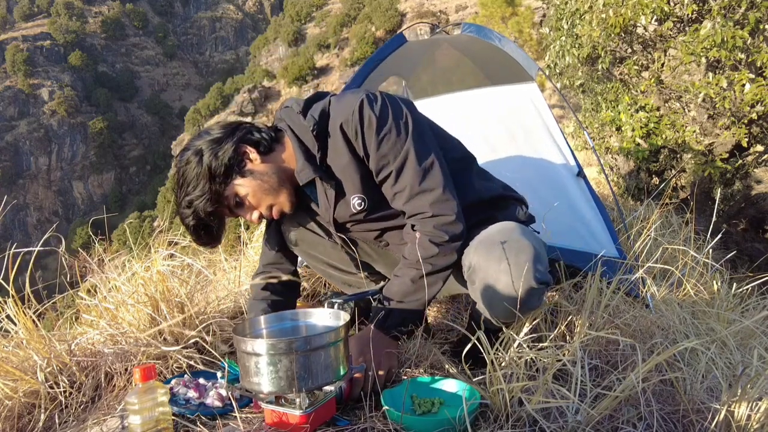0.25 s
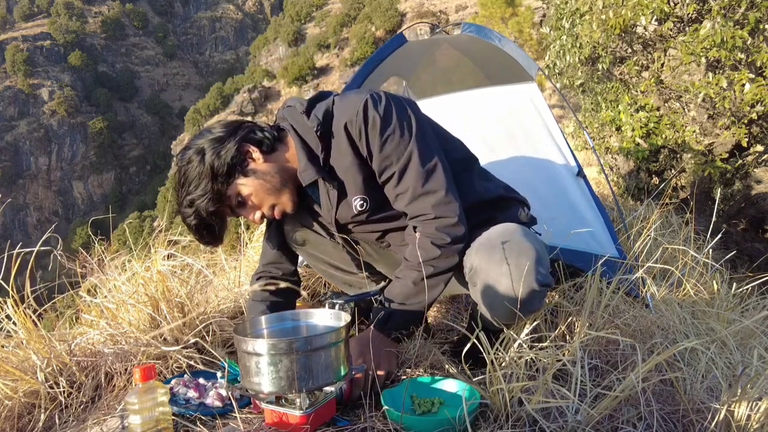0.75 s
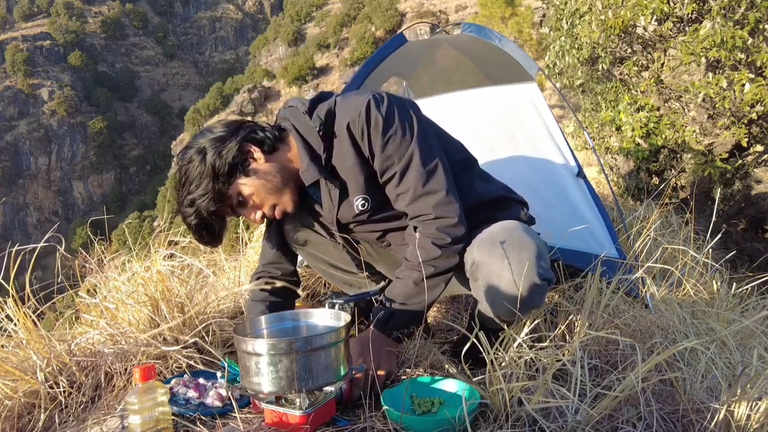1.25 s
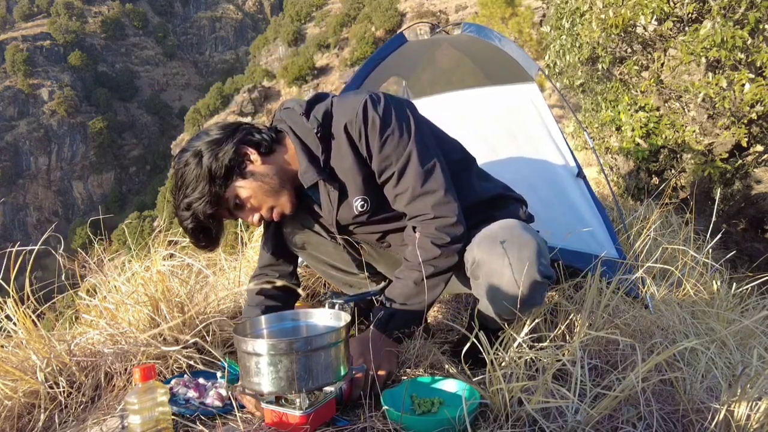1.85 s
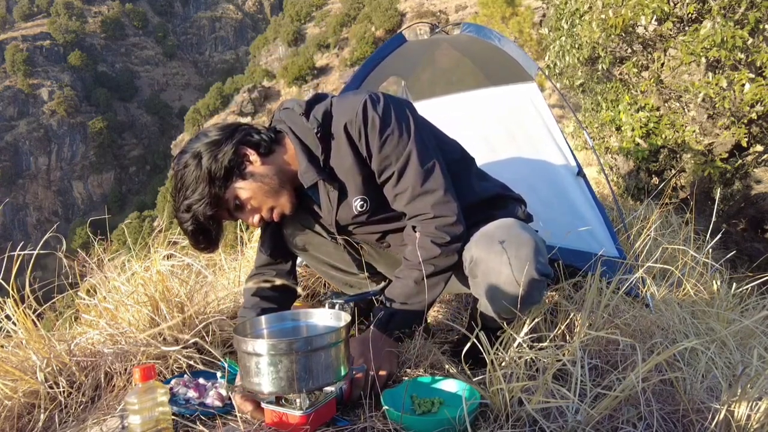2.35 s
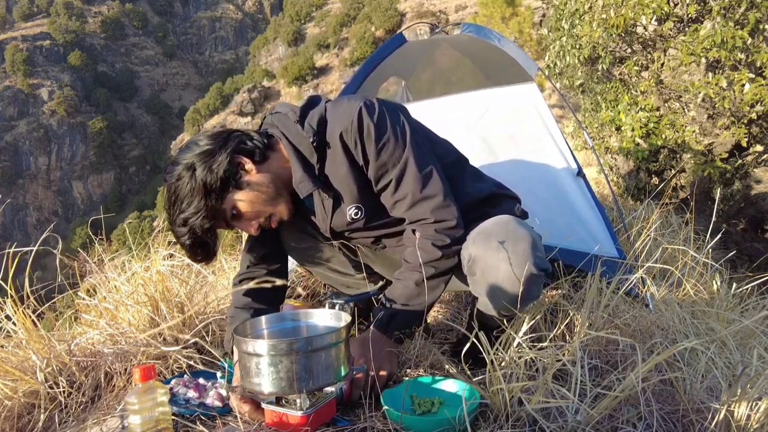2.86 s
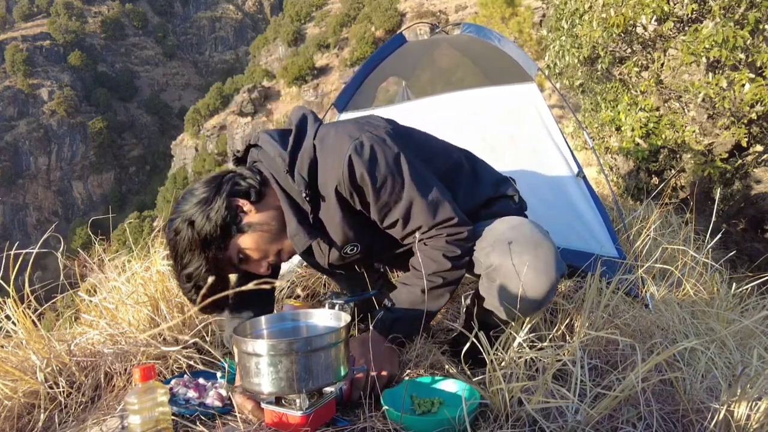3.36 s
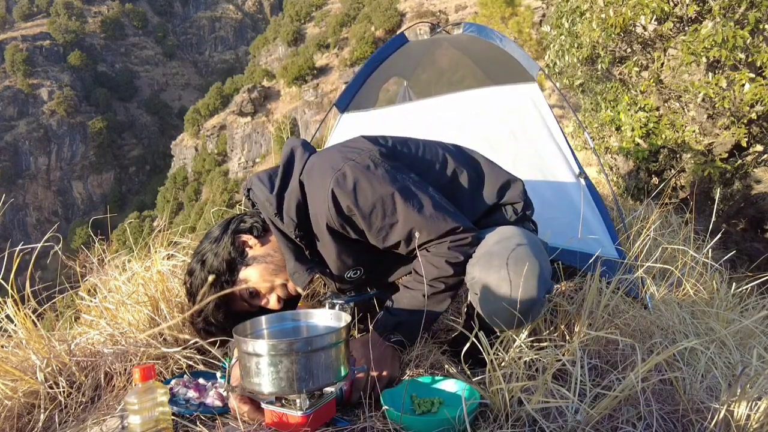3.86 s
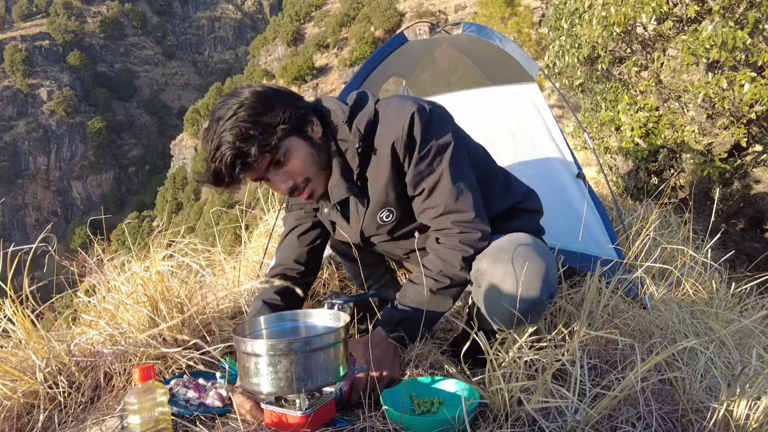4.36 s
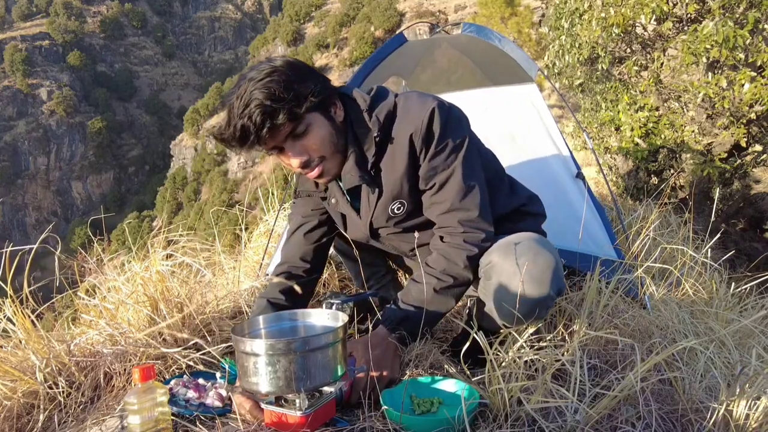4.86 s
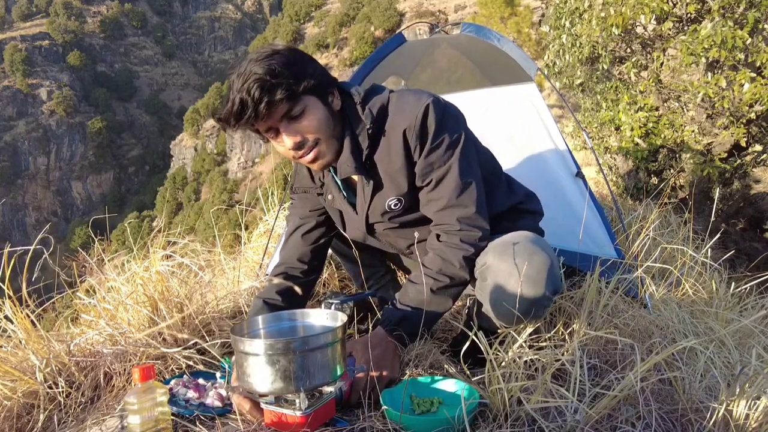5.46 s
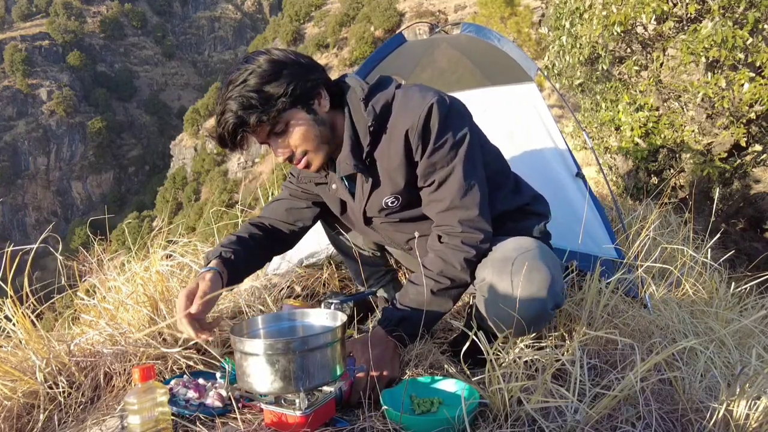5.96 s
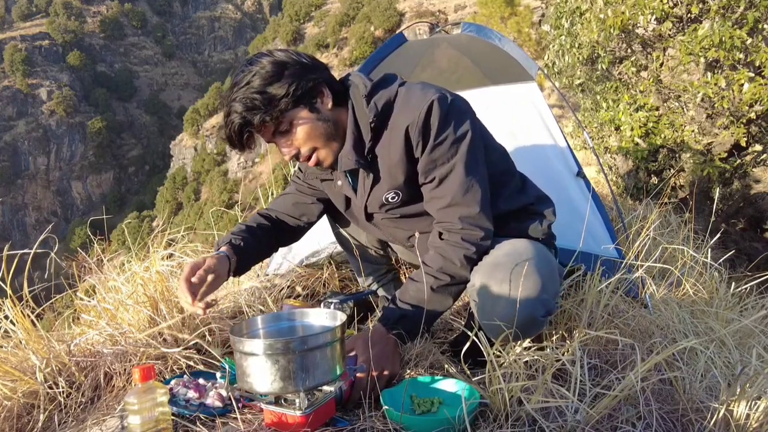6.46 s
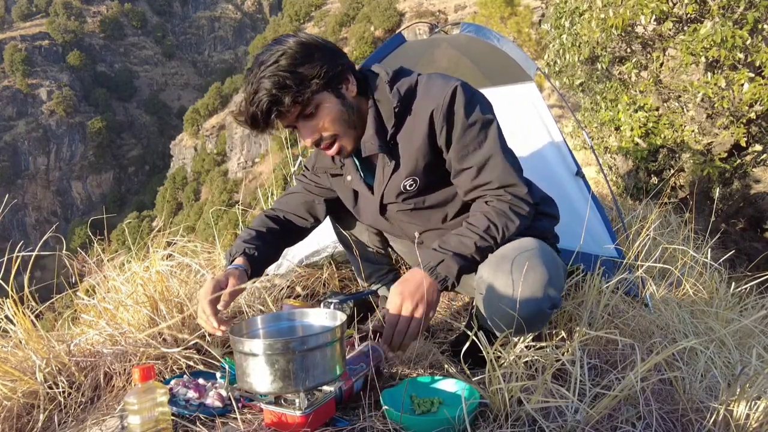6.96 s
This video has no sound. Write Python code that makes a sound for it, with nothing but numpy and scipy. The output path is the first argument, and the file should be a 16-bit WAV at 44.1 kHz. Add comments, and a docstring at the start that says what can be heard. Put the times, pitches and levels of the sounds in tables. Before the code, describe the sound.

A portable stove is lit beneath a steel pot, heard close in dry open air. Light knob ticks and airy gas spurts come first, over faint low wind. Bright, sharp snaps with short metallic ringing follow, two spaced apart, then six fairly regular ones. The gas catches with a low, muffled whump, leaving a very soft flame, thin hiss, finger taps and jacket rustle.

```python
"""A portable gas stove is lit under a steel pot: eight igniter snaps strike damped modes of casing and pot.
Gas hisses as noise shaped by the mixing tube, with airy whistles; the knob ticks as it turns back.
Just after the last spark, swings of pressure make pops and a low thump, and low noise makes the flame.
Jacket and dry grass rustle as grainy noise, fingers tap and rub the stove,
and behind lie a faint, wavering low wind and a short twitter of a distant bird."""
import sys
import numpy as np
from scipy import signal
from scipy.fft import rfft, irfft, next_fast_len
from scipy.io import wavfile

SR = 44100
rng = np.random.default_rng(int(sys.argv[2]) if len(sys.argv) > 2 else 0)


def waveform_to_disk(signal):
    """Save audio, clipped to [-1, 1], as 16-bit WAV at the path in sys.argv[1]."""
    frames = np.transpose(np.atleast_2d(signal))
    scaled = np.clip(frames, -1, 1) * 32767
    samples = np.round(scaled).astype(np.int16)
    wavfile.write(sys.argv[1], SR, samples)


N = 318222
TIME = np.arange(N) / SR  # s
EDGE_HZ = 15900  # upper edge of the whole sound

# All spectra below are relative: noise() brings them to rms 1. Layer trims apply to the other levels.
# IGNITER
# snaps: [t/s, level/dB, treble/dB, base knock/dB, casing tilt/dB per octave,
#         cocking scrape/s, scrape level/dB, left minus right/dB]; levels after the first are relative to it
SNAPS = [(2.2971, -27.5, 1, -5.5, 0.5, 0.0044, -24, 2), (2.8287, -27, 1, -13, 5.5, 0.028, -19, -0.5),
         (4.0437, -27.5, 1.5, -5.5, 1, 0.0056, -9.5, 3), (4.304, -27, -0.5, 0.5, -1, 0.0048, -4.5, 0),
         (4.5318, -26, -2, 0, -0.5, 0.017, -13.5, -1.5), (4.7627, -25.5, -2, 0, -1, 0.0028, -6, 4.5),
         (4.995, -24.5, 0.5, 0, -3, 0.013, -17, -0.5), (5.2041, -23.5, -1.5, -1.5, -2, 0.016, -20, 0)]
# stove casing modes: [f/Hz, level standing free/dB, level steadied by a hand/dB, t60/s]
CASING_MODES = [(1080, -16.5, -27, 0.11), (1162, -27, -12, 0.04), (1315, -12, -11, 0.09),
                (1594, -1, -8, 0.029), (1690, -15, -8, 0.032), (2500, -16, -10.5, 0.029),
                (2670, -1, -1.5, 0.024), (3396, -4, -1.5, 0.026)]
# modes of the pot and its supports: [f/Hz, level standing free/dB, level steadied by a hand/dB, t60/s]
POT_MODES = [(339, -13.5, -14.5, 0.61), (495, -17, -5.5, 0.52), (557, -24, -12, 0.4),
             (632, -10.5, -19, 0.079), (995, -3.5, -14, 0.54), (1026, -4.5, -5.5, 0.54),
             (1213, -18, -2, 0.19), (1250, -6, 2.5, 0.37), (1270, -25, 6.5, 0.19), (1510, -14, -10, 0.77),
             (2030, -16, -20, 0.9), (2410, -15, -4, 0.28), (2710, -5, -6, 0.6), (2840, -5, -22, 0.46),
             (3700, -12, -33, 0.11), (3600, -24, -4, 0.25), (4060, -12, -61, .2)]
# base plate modes: [f/Hz, level/dB, t60/s]
BASE_MODES = [(550, -23, 0.016), (667, -12, 0.02), (800, -15, 0.017), (897, -22, 0.017)]
# spectrum of the crack: [f/Hz, level/dB]
CRACK_SPECTRUM = [(300, -37), (1000, -10.5), (1700, -7), (2150, -22), (2700, 0), (3400, -10.5), (3950, -18),
                  (4400, -1.5), (5500, -8), (6800, -4.5), (8100, -4), (9000, -1), (9800, -4.5),
                  (11800, -2.5), (13400, 1), (16000, 5.5)]
# resonances of the hammer and its spring: [f/Hz, width/Hz, level over the crack/dB]
SPRING_PEAKS = [(7470, 160, 12.5), (9080, 250, 4.5), (10600, 700, 5), (13490, 350, 8), (15650, 170, -3)]
# spectrum of loose rattling parts: [f/Hz, level/dB]
RATTLE_SPECTRUM = [(200, -15), (500, -12.5), (850, -1.5), (1250, 11.5), (1650, 8), (2100, 1.5), (2650, 3),
                   (3400, -5.5), (4000, 1.5), (5500, -7.5), (7500, -5.5), (11000, -7.5), (16000, -2)]
# how the casing colours those parts: [f/Hz, width/Hz, level/dB]
CHASSIS_PEAKS = [(955, 180, -10), (1280, 120, 3.5), (1370, 130, -2.5), (2150, 330, -7), (2710, 250, -0.5),
                 (3060, 240, -2), (3430, 250, 10.5), (3730, 330, -9)]
STEADIED_S = 3.5  # from here a hand steadies the stove

# KNOB AND FINGERS
# ticks of the valve knob: [t/s, level/dB, treble relative to it/dB]
TICKS = [(.145, -69, 3), (.980, -74, 4.5), (1.094, -48.5, -6), (1.441, -51, -5), (2.5786, -46.5, -4),
         (3.081, -44.5, 0), (3.733, -52.5, 6.5), (3.867, -70, 4), (4.2119, -39.5, -3.5), (4.448, -41.5, -2),
         (4.662, -41, -1), (4.884, -39.5, -2.5), (5.1203, -43.5, -0.5), (5.3197, -39, -6),
         (5.492, -50, -12)]
# spectrum of the bright edge of a tick: [f/Hz, level/dB]
TICK_SPECTRUM = [(300, -48), (700, -1), (1100, -12), (1600, 2.5), (2100, -3), (2500, -3), (3000, -6),
                 (6200, -3.5), (6900, -10.5), (7600, -2), (8200, -9.5), (11500, -15), (13200, -1.5),
                 (16000, 0.5)]
# fingers tapping the stove: [t/s, level/dB, resonance f/Hz]
TAPS = [(2.074, -57.5, 1310), (2.477, -57, 1340), (3.277, -54.5, 1530), (5.351, -53.5, 1200),
        (5.493, -50.5, 1590), (6.632, -57, 1255)]
# spectrum of a tap: [f/Hz, level/dB]
TAP_SPECTRUM = [(300, -21), (800, -2), (1400, -3), (2500, -9), (6000, -24), (16000, -36)]
TAP_WIDTH_HZ, TAP_PEAK_DB = 210, 17  # width and height of the tap's resonance
# casing modes stirred by rubbing fingers: [f/Hz, level/dB, t60/s]
RUBBED_MODES = [(1089, -7.5, 0.16), (1203, -2, 0.062), (1326, 0, 0.062), (1454, 1.5, 0.038),
                (1520, -25, 0.018)]
# fingers rub the knob just before each snap once the stove is steadied; level ahead of the bass cut
GRIP_LEAD_S, GRIP_WIDTH_S, GRIP_DB = 0.017, 0.098, -64
# at the end a hand slides along the casing; level ahead of the bass cut
SLIDE_S, SLIDE_WIDTH_S, SLIDE_DB = 7.1, 0.25, -61.5

# GAS
# spurts as the valve is opened by stages: [t/s, level/dB, rise/s, hold/s, t60/s]
SPURTS = [(1.079, -57, 0.044, 0.04, 0.14), (1.199, -54.5, .15, 0.052, 0.97),
          (1.439, -51.5, 0.079, 0.07, 1.7), (1.832, -57.5, 0.18, 0.09, 0.35)]
# spectrum of the jet: [f/Hz, level/dB]
JET_SPECTRUM = [(200, -41), (600, -9), (1000, -8), (2000, -7.5), (4000, -6.5), (4700, -10.5), (6400, -9.5),
                (7000, -21), (9200, -9.5), (10000, -18), (16000, -14.5)]
# resonances of the mixing tube and burner: [f/Hz, width/Hz, level over the jet/dB]
TUBE_PEAKS = [(1374, 175, 8), (2496, 150, 8.5), (3190, 290, 6.5), (3700, 140, -1), (5670, 150, 7),
              (7720, 390, 11), (8550, 300, 0.5)]
# spectrum of the tube's whistle: [f/Hz, level/dB]
TUBE_WHISTLE_SPECTRUM = [(2200, -34), (2970, -3.5), (3140, 8), (3320, -23), (4400, -62)]
# spectrum of the nozzle's whistle: [f/Hz, level/dB]
NOZZLE_WHISTLE_SPECTRUM = [(4500, -50), (5400, -18), (5620, 11), (6000, -5), (7500, -56)]
# the steady flow behind the spurts weakens slowly
FLOW_FROM_S, FLOW_DB, FLOW_SAG_DB_PER_S = 1.2, -64.5, 0.65
# each whistle follows a share of the flow
TUBE_SHARE_DB, NOZZLE_SHARE_DB = -11.5, -8.5
FULL_FLOW_DB = -52  # flow at which the nozzle gets its full share; weaker flow gives it less
# the tube swells as the flow settles, the nozzle as the burner warms
TUBE_SWELL_S, TUBE_SWELL_DB, NOZZLE_SWELL_S, NOZZLE_SWELL_DB = 1.62, -62, 5.99, -72.5

# IGNITION
# spectrum of the flare's roar: [f/Hz, level/dB]
FLARE_SPECTRUM = [(20, 0), (90, -9), (200, 0.5), (265, -24), (400, -6), (620, -15), (850, -25), (1200, -57),
                  (2000, -45), (6000, -60)]
# spectrum of the burning flame: [f/Hz, level/dB]
FLAME_SPECTRUM = [(15, -2.5), (28, -3), (80, -12), (200, -18.5), (600, -45)]
# the flame front runs round the burner in evenly spaced, growing pops
LIGHT_S, POP_GAP_S, POP_DB, POP_GROWTH_DB, POP_SWING_S = 5.229, 0.01004, -19, 2, 0.0015
# the pooled gas goes up in one thump; the rebound of the air comes later, its level relative to the thump
THUMP_S, THUMP_DB, THUMP_SWING_S, REBOUND_S, REBOUND_DB = 5.2485, -9, 0.0045, 0.0277, -16
# the roar peaks just before the thump
ROAR_S, ROAR_WIDTH_S, ROAR_DB = 5.237, 0.028, -31.5

# CAMPER
# movements: [middle t/s, half length/s, jacket and grass level/dB, sleeve on stove level/dB]
MOVES = [(0.106, 0.48, -64, -74), (0.658, 0.12, -70, -78.5), (1.805, 0.66, -72.5, -73),
         (3.255, 0.1, -62.5, -58.5), (3.585, 0.28, -61.5, -62.5), (4.524, 0.96, -65, -68.5),
         (5.85, 0.53, -70, -69.5), (6.538, 0.22, -66, -70.5), (7.176, 0.37, -59, -65)]
# spectrum of jacket and grass: [f/Hz, level/dB]
CLOTH_SPECTRUM = [(100, 9), (400, -22.5), (900, -9), (1400, -4), (2200, -5.5), (6000, -5), (8500, -7),
                  (11500, -9), (13500, -3), (16000, 3.5)]
# spectrum of the sleeve on the stove: [f/Hz, level/dB]
RUBBING_SPECTRUM = [(100, 5), (250, -5), (600, 1), (950, -4), (1400, -3.5), (1900, -6), (3000, -9.5),
                    (6000, -19), (16000, -17)]
# spectrum of the soft bump and brushing: [f/Hz, level/dB]
BRUSH_SPECTRUM = [(60, -10), (140, 4.5), (240, 4), (350, -3), (550, -11), (1500, -18), (4000, -22.5),
                  (16000, -36)]
# a soft bump as the camper leans down, with brushing around it
BUMP_S, BUMP_DB, BRUSH_DB = 3.223, -48.5, -59

# HILLSIDE
# spectrum of the breeze: [f/Hz, level/dB]
WIND_SPECTRUM = [(8.8, -12), (15, 5.5), (27, -6), (45, -0.5), (76, -7.5), (109, -6), (269, -20),
                 (336, -22.5), (420, -34.5), (550, -47), (920, -120)]
# small puffs of wind: [t/s, level/dB]
PUFFS = [(.67, -55.5), (.74, -65), (1.15, -56), (1.34, -55), (2.13, -53), (2.72, -50.5), (2.98, -57),
         (3.78, -53.5), (5.96, -57)]
# spectrum of a puff: [f/Hz, level/dB]
PUFF_SPECTRUM = [(12, -12), (35, 9.5), (60, -12), (130, -25)]
# spectrum of the bird's chirps: [f/Hz, level/dB]
CHIRP_SPECTRUM = [(4300, -60), (5000, -3), (5270, 3), (5550, -4), (6300, -60)]
# spectrum of the quiet background hiss: [f/Hz, level/dB]
AIR_SPECTRUM = [(180, -41), (300, -7.5), (411, -7.5), (446, -7.5), (953, -17), (1300, -9.5), (2320, -16.5),
                (15500, -16)]
WIND_DB = -65.5  # level about which the breeze wavers
BIRD_FROM_S, BIRD_TO_S, BIRD_JITTER_S, BIRD_DB, BIRD_SPREAD_DB = .4, .715, 0.0088, -71.5, 1.5

# STEREO
# likeness of the two channels of noise: [f/Hz, correlation from -1 to 1]
CHANNEL_LIKENESS = [(20, 0.99), (150, 0.99), (350, 0.67), (700, 0.18), (1400, 0.63), (2800, 0.58),
                    (5600, 0.17), (10000, 0.02), (15000, -.2)]


def igniter():
    """The hammer scrapes up its ramp and strikes: a crack, casing modes, loose chatter, the pot ringing."""
    blows, knocks, rattle = np.zeros((3, N))
    crack, casing = np.zeros((2, 2, N))
    for s, db, treble_db, base_db, tilt_db, cocking, scrape_db, left_db in SNAPS:
        blow = amp(db) * signal.unit_impulse(N, round(s * SR))
        blows += blow
        knocks += amp(base_db) * blow
        # the scrape climbs until the strike cuts it off
        scrape_times = [s - cocking - .001, s - cocking, s]
        scrape = amp(scrape_db) * np.interp(TIME, scrape_times, [0, .4, 1], right=0)
        crack += pan(amp(db + treble_db) * (burst(s, rise=0.011, t60=0.033) + scrape), left_db)
        rattle += amp(db) * (burst(s + .003, rise=.018, t60=.125) + scrape / 2)
        casing += ring(blow, casing_modes(s > STEADIED_S, tilt_db), spread=0.42)
    casing_band = signal.butter(3, [900, 4300], "band", fs=SR, output="sos")
    casing = amp(-0.8) * signal.sosfilt(casing_band, casing)
    base = amp(1.5) * thin(ring(knocks, BASE_MODES, spread=0.34), edge_hz=570)
    loose = amp(-11.5) * rattle * noise(RATTLE_SPECTRUM, CHASSIS_PEAKS)
    crack = amp(1.5) * crack * noise(CRACK_SPECTRUM, SPRING_PEAKS, grain=0.3)
    return casing + base + pot(blows) + loose + crack


def casing_modes(is_held, tilt_db):
    """Casing modes for one snap, tilted about 2 kHz; the changing grip detunes them slightly."""
    modes = []
    for hz, free_db, held_db, t60 in CASING_MODES:
        db = (held_db if is_held else free_db) + tilt_db * np.log2(hz / 2000)
        modes.append((hz * rng.uniform(0.98, 1.015), db, t60))
    return modes


def pot(blows):
    """The snaps ring the pot; once a hand steadies the stove, other modes take over."""
    steadied = TIME > STEADIED_S
    free_modes = [(hz, db, t60) for hz, db, _, t60 in POT_MODES]
    held_modes = [(hz, db, t60) for hz, _, db, t60 in POT_MODES]
    free = ring(blows * ~steadied, free_modes, spread=0.52)
    held = ring(blows * steadied, held_modes, spread=0.44)
    return amp(-29.0) * thin(free + held, edge_hz=190)


def gas():
    """The jet hisses through the mixing tube: spurts, then a soft steady flow; tube and nozzle whistle."""
    sagging_db = FLOW_DB - FLOW_SAG_DB_PER_S * (TIME - FLOW_FROM_S)
    steady = amp(sagging_db) * (TIME > FLOW_FROM_S) * flutter(per_s=7.8, depth_db=3.1)
    spurts = [amp(db) * burst(s, rise, t60, hold) for s, db, rise, hold, t60 in SPURTS]
    flow = together([steady] + spurts)
    tube_swell = amp(TUBE_SWELL_DB) * burst(TUBE_SWELL_S, rise=1.2, t60=3.8)
    tube = together([amp(TUBE_SHARE_DB) * flow, tube_swell])
    # the nozzle's whistle grows faster than the flow
    nozzle_share = amp(NOZZLE_SHARE_DB) * flow * np.sqrt(flow / amp(FULL_FLOW_DB))
    nozzle_swell = amp(NOZZLE_SWELL_DB) * swell(NOZZLE_SWELL_S, width=0.2)
    nozzle = together([nozzle_share, nozzle_swell])
    hiss = flow * noise(JET_SPECTRUM, TUBE_PEAKS)
    whistles = tube * noise(TUBE_WHISTLE_SPECTRUM) + nozzle * noise(NOZZLE_WHISTLE_SPECTRUM)
    return pan((hiss + whistles) * flutter(per_s=100, depth_db=0.6), left_db=1.0)


def ignition():
    """Pooled gas catches with pops and a thump inside a short turbulent roar, then burns softly."""
    rebound = amp(REBOUND_DB) * pop(THUMP_S + REBOUND_S, THUMP_SWING_S)
    thump = amp(THUMP_DB) * (pop(THUMP_S, THUMP_SWING_S) + rebound)
    roar = amp(ROAR_DB) * swell(ROAR_S, ROAR_WIDTH_S) * noise(FLARE_SPECTRUM, top_hz=4000)
    flare = amp(-31) * swell(THUMP_S, width=0.037)
    flare_tail = amp(-44) * burst(THUMP_S, rise=.08, t60=0.55)
    settling = amp(-58.5) * swell(THUMP_S + 0.49, width=0.3)
    burning = amp(-69) * (TIME > THUMP_S)
    flame = together([flare, flare_tail, settling, burning]) * noise(FLAME_SPECTRUM, top_hz=700)
    return pan(flame_front(count=3) + thump + roar + flame, left_db=-2.0)


def flame_front(count):
    """Each stretch of the burner ring catches a little harder than the last."""
    pops = 0
    for k in range(count):
        pops = pops + amp(POP_DB + k * POP_GROWTH_DB) * pop(LIGHT_S + k * POP_GAP_S, POP_SWING_S)
    return pops


def pop(s, swing):
    """One swing of air pressure, down and then up."""
    u = (TIME - s) / swing
    return u * np.exp(-u ** 2 / 2)


def knob():
    """The mechanism resets with a light tick: a bright edge and a duller rattle."""
    bright = sum(amp(db + treble_db) * burst(s, rise=0.033, t60=0.061) for s, db, treble_db in TICKS)
    dull = sum(amp(db) * burst(s, rise=0.013, t60=0.11) for s, db, _ in TICKS)
    edge = amp(-0.5) * bright * noise(TICK_SPECTRUM, grain=0.75)
    return pan(edge + amp(-10.5) * dull * noise(RATTLE_SPECTRUM), left_db=0.5)


def fingers():
    """Fingers tap the stove, and stir its modes as they turn the knob, let it go and slide on the casing."""
    taps = 0
    for s, db, hz in TAPS:
        tap_noise = noise(TAP_SPECTRUM, [(hz, TAP_WIDTH_HZ, TAP_PEAK_DB)])
        taps = taps + amp(db) * burst(s, rise=0.0051, t60=0.075) * tap_noise
    grips = [swell(s - GRIP_LEAD_S, GRIP_WIDTH_S) for s, *_ in SNAPS if s > STEADIED_S]
    turning = amp(GRIP_DB) * sum(grips)
    letting_go = amp(-19.0) * sum(amp(db) * burst(s, rise=0.036, t60=0.42) for s, db, _ in TICKS)
    sliding = amp(SLIDE_DB) * swell(SLIDE_S, SLIDE_WIDTH_S)
    touch = together([turning, letting_go, sliding])
    friction = rng.standard_normal(N) * flutter(per_s=100, depth_db=1.5)
    return taps + thin(touch * unit(ring(friction, RUBBED_MODES, spread=0.23)), edge_hz=1080)


def camper():
    """Jacket and dry grass crackle at each movement while a sleeve rubs the stove; one soft bump."""
    rustle = together(amp(db) * swell(s, width) for s, width, db, _ in MOVES)
    rustle = rustle * flutter(per_s=86, depth_db=1.5)
    rub = together(amp(db) * swell(s, width) for s, width, _, db in MOVES)
    rub = rub * flutter(per_s=39, depth_db=0.9)
    bump = amp(BUMP_DB) * burst(BUMP_S, rise=0.03, t60=0.047)
    brushing = amp(BRUSH_DB) * burst(BUMP_S, rise=0.27, t60=0.2)
    cloth = rustle * noise(CLOTH_SPECTRUM, grain=0.6)
    return cloth + rub * noise(RUBBING_SPECTRUM) + (bump + brushing) * noise(BRUSH_SPECTRUM)


def hillside():
    """Lumpy low wind and a faint bird over a very quiet hiss."""
    breeze = amp(WIND_DB) * flutter(per_s=16, depth_db=1.5) * noise(WIND_SPECTRUM, top_hz=500)
    puffs = sum(amp(db) * burst(s, rise=0.26, t60=0.34) for s, db in PUFFS)
    wind = breeze + puffs * noise(PUFF_SPECTRUM, top_hz=202)
    return wind + bird(count=9) + amp(-75.5) * noise(AIR_SPECTRUM)


def bird(count):
    """A quick, uneven run of tiny chirps, each a brief swell of narrow-band noise."""
    late, loud = rng.standard_normal((count, 2)).T
    times = np.linspace(BIRD_FROM_S, BIRD_TO_S, count) + BIRD_JITTER_S * late
    gains = amp(BIRD_DB + BIRD_SPREAD_DB * loud)
    return sum(gain * swell(s, width=.0032) for s, gain in zip(times, gains)) * noise(CHIRP_SPECTRUM)


def ring(blows, modes, spread):
    """Blows excite damped modes, which reach the two channels with slightly different phases."""
    t = np.arange(SR) / SR
    turn = spread * np.array([[1], [-1]])  # radians at 1 kHz
    answer = 0
    for hz, db, t60 in modes:
        phase = 2 * np.pi * hz * t + turn * np.sqrt(hz / 1000)
        answer = answer + amp(db - 60 * t / t60) * np.cos(phase)
    return signal.oaconvolve(blows[None], answer, axes=1)[:, :N]


def noise(spectrum, peaks=(), grain=0., top_hz=None):
    """Stereo noise of rms 1 with a spectrum, resonances, and optionally a crackly grain."""
    size = next_fast_len(N)
    hz = np.fft.rfftfreq(size, 1 / SR)
    grains = np.exp(grain * np.clip(rng.standard_normal(N), -3, 3))
    a, b = rfft(rng.standard_normal((2, N)) * grains, size)
    same = np.clip(read(CHANNEL_LIKENESS, hz), -1, 1)
    mid, side = a * np.sqrt(1 + same), b * np.sqrt(1 - same)
    peaks_db = sum(d / (1 + (2 * (hz - f) / w) ** 2) for f, w, d in peaks)
    gain = amp(read(spectrum, hz) + peaks_db) / (1 + (hz / (top_hz or EDGE_HZ)) ** 8)
    return unit(irfft(np.array([mid + side, mid - side]) * gain, size)[:, :N])


def burst(s, rise, t60, hold=0):
    """Swells by 60 dB in the rise time up to s, holds, then falls by 60 dB per t60."""
    steps = np.maximum((s - TIME) / rise, (TIME - s - hold) / t60)
    return amp(-60 * np.clip(steps, 0, 3))


def swell(s, width):
    """A smooth bell-shaped rise and fall around s."""
    return np.exp(-np.minimum(((TIME - s) / width) ** 2, 30))


def flutter(per_s, depth_db):
    """Random wavering gain, drawn per_s times a second and joined by straight lines in dB."""
    knots = np.arange(0, TIME[-1] + 1, 1 / per_s)
    return amp(depth_db * np.interp(TIME, knots, rng.standard_normal(len(knots))))


def together(gains):
    """Gain of unrelated sounds heard at once: their powers add."""
    return np.sqrt(sum(gain ** 2 for gain in gains))


def thin(x, edge_hz):
    """A small body radiates little bass."""
    return signal.sosfilt(signal.butter(3, edge_hz, "high", fs=SR, output="sos"), x)


def pan(x, left_db):
    """Leans a sound to the left, or to the right if negative."""
    return x * amp([[left_db / 2], [-left_db / 2]])


def read(points, hz):
    """Reads a spectrum on a log-frequency axis."""
    f, value = np.transpose(points)
    return np.interp(np.log(hz + 1), np.log(f + 1), value)


def unit(x):
    """Scales to rms 1."""
    return x / np.sqrt(np.mean(x ** 2) + 1e-20)


def amp(db):
    """Decibels to gain."""
    return 10 ** (np.asarray(db) / 20)


def scene():
    """Stove, camper and hillside."""
    return igniter() + gas() + ignition() + knob() + fingers() + camper() + hillside()


def record(dry):
    """Limits the band with a steep low-pass at the upper edge."""
    low_pass = signal.firwin(401, EDGE_HZ, window=("kaiser", 8), fs=SR)
    return signal.oaconvolve(dry, low_pass[None], "same")


dry = scene()
out = record(dry)
waveform_to_disk(out)
```